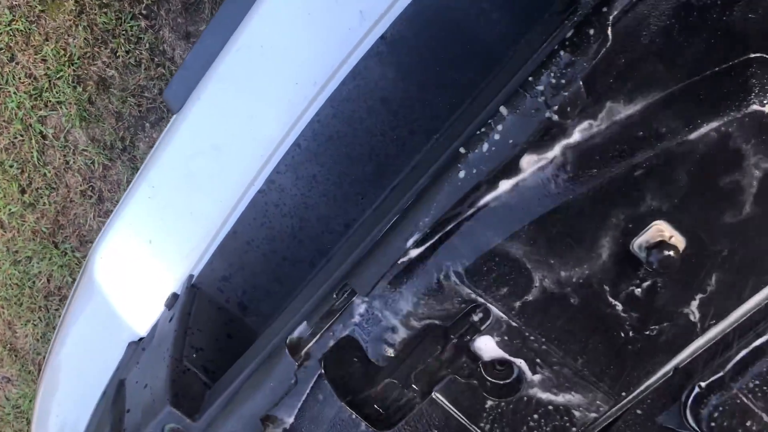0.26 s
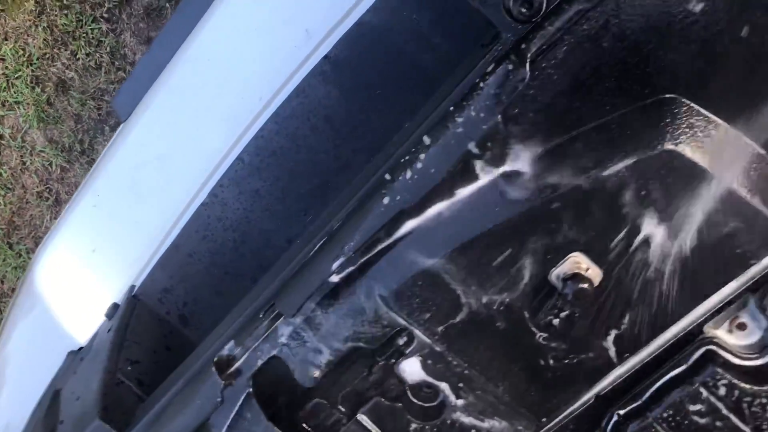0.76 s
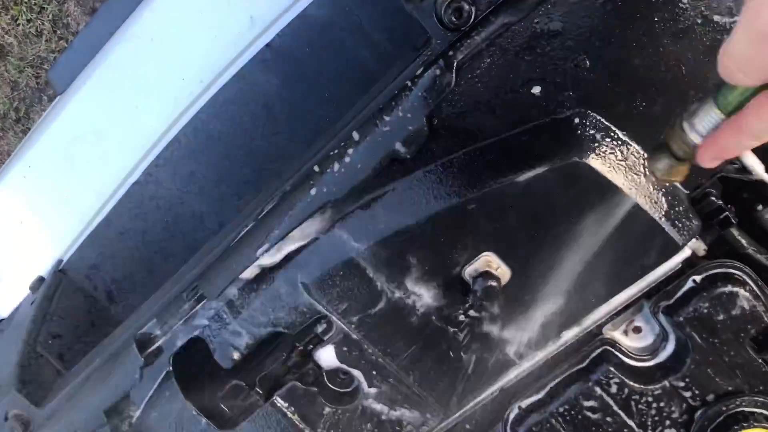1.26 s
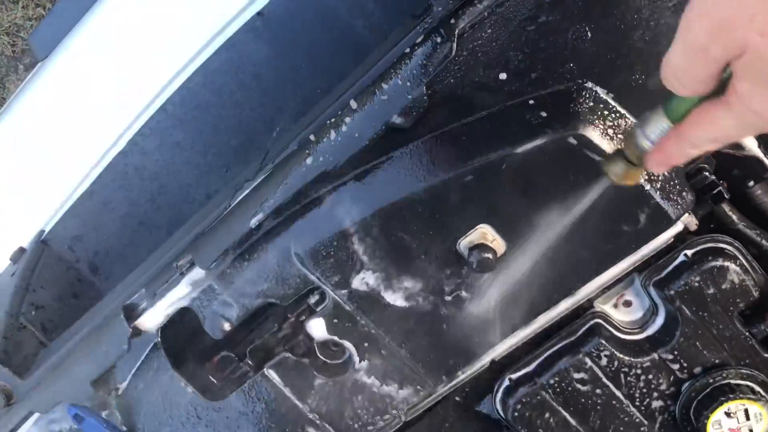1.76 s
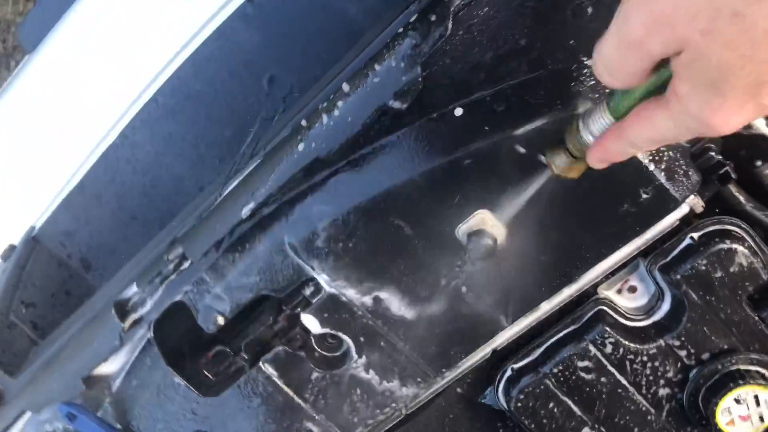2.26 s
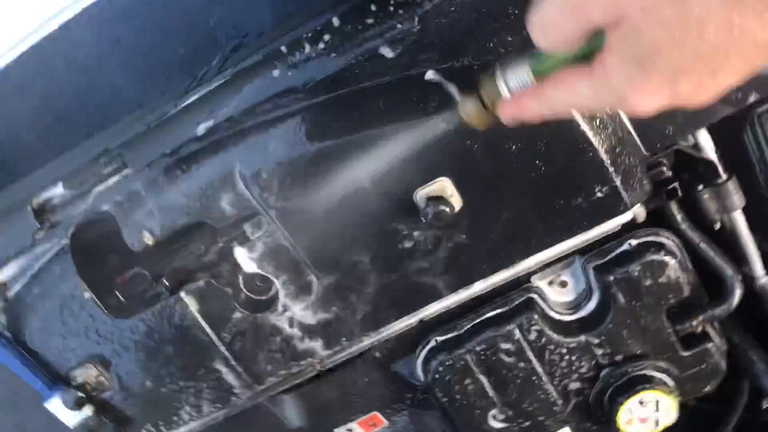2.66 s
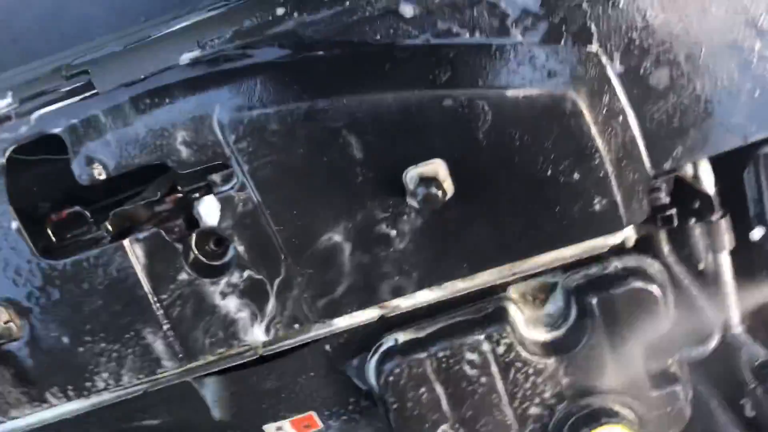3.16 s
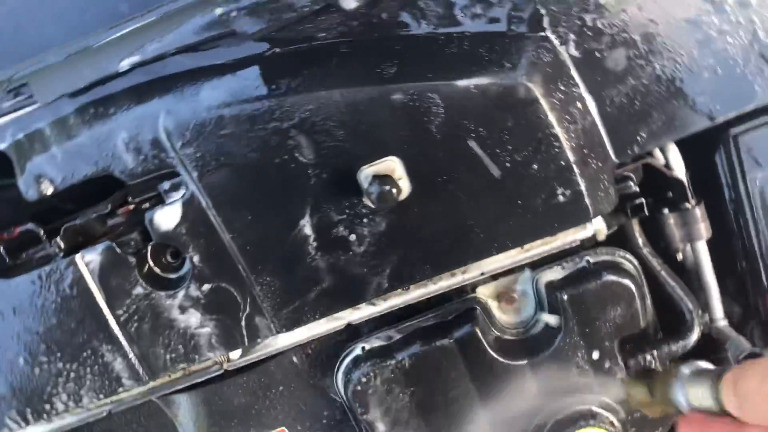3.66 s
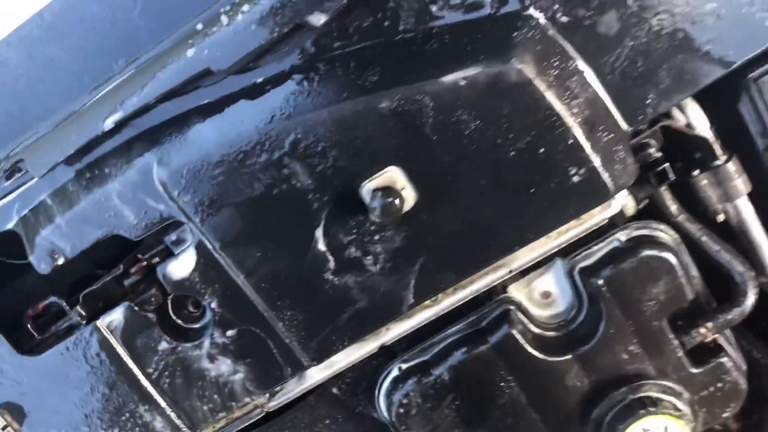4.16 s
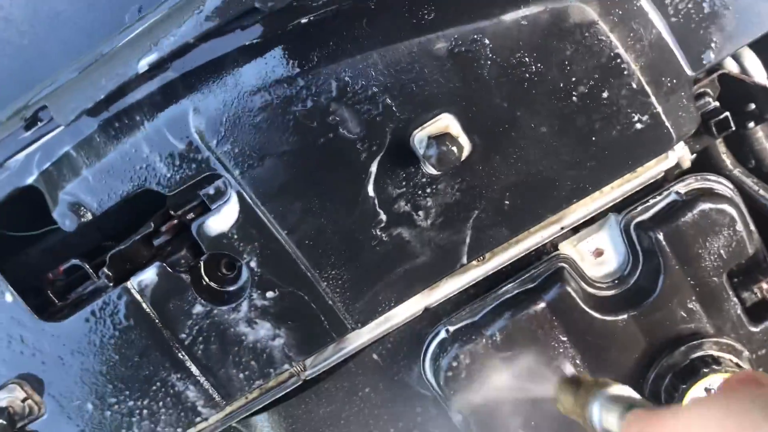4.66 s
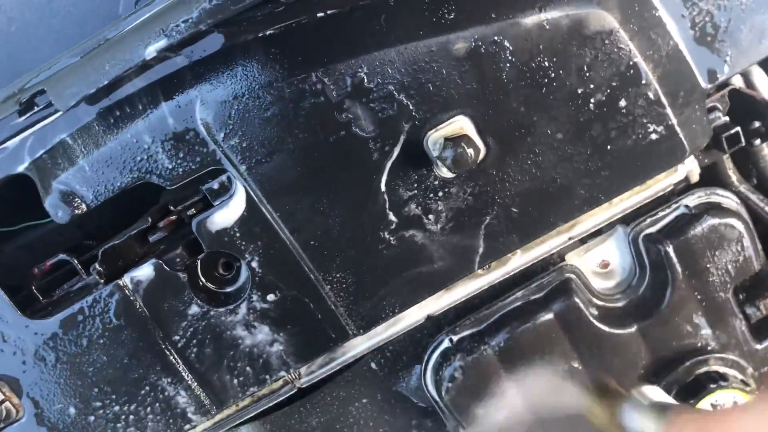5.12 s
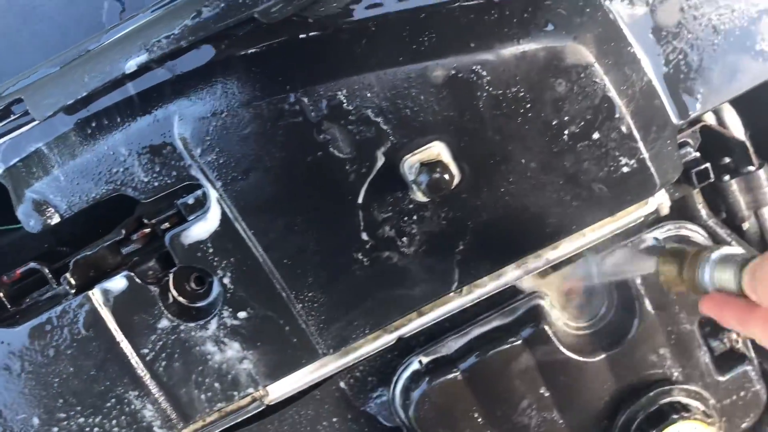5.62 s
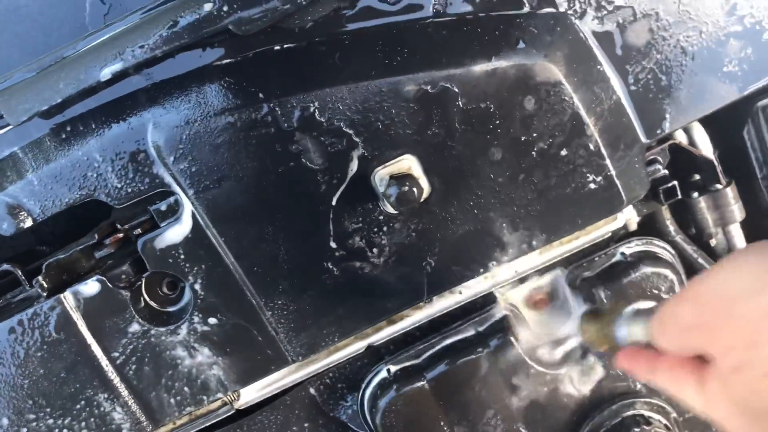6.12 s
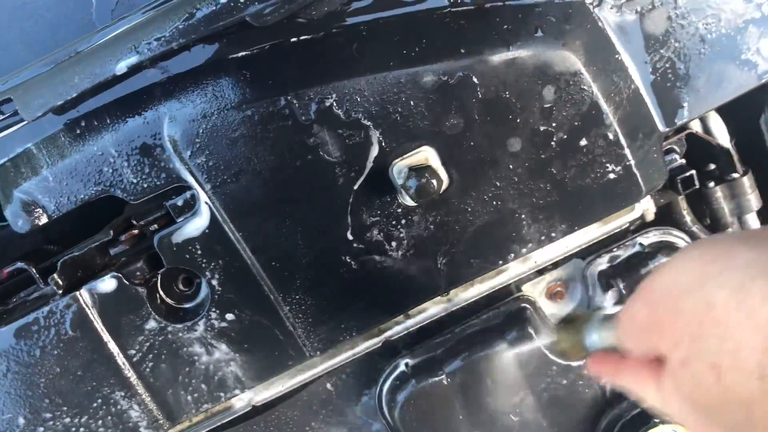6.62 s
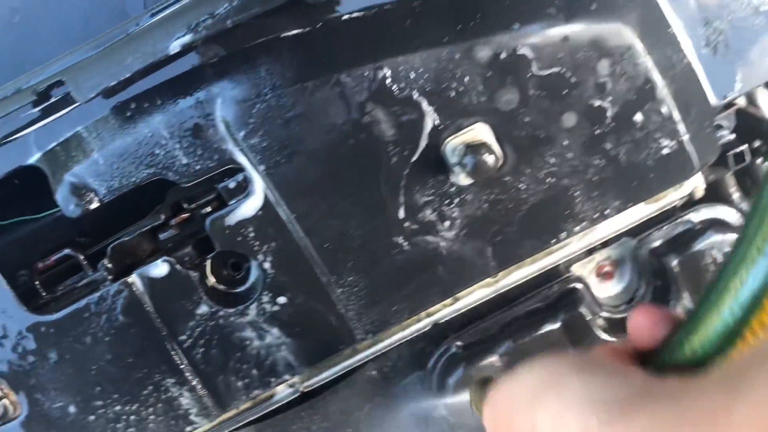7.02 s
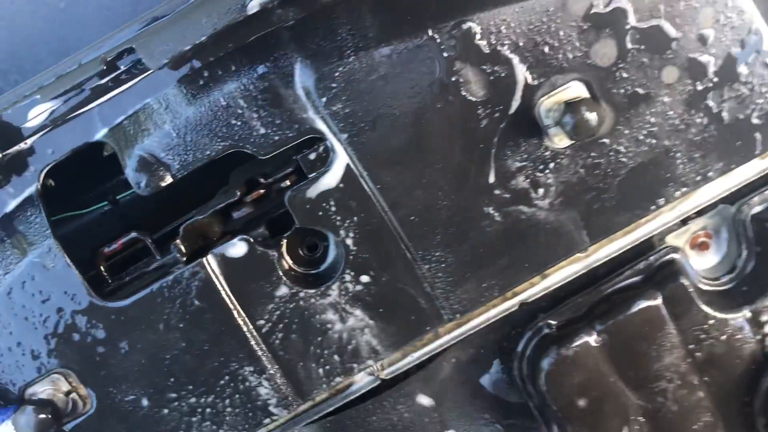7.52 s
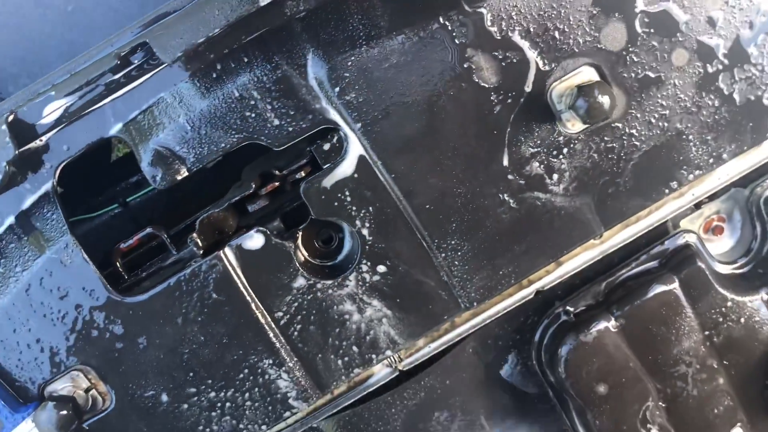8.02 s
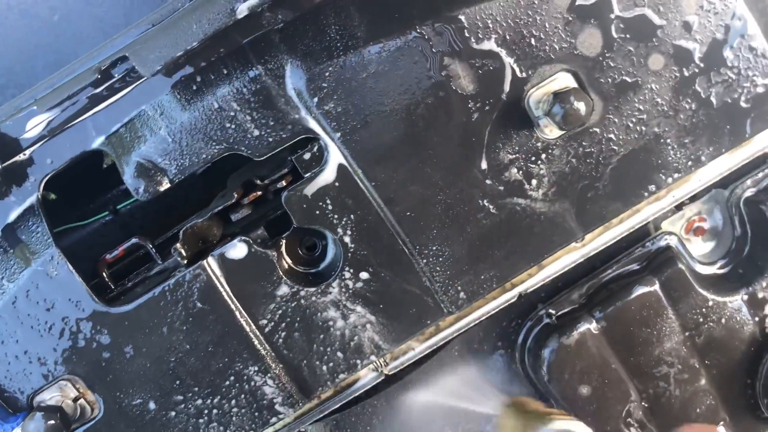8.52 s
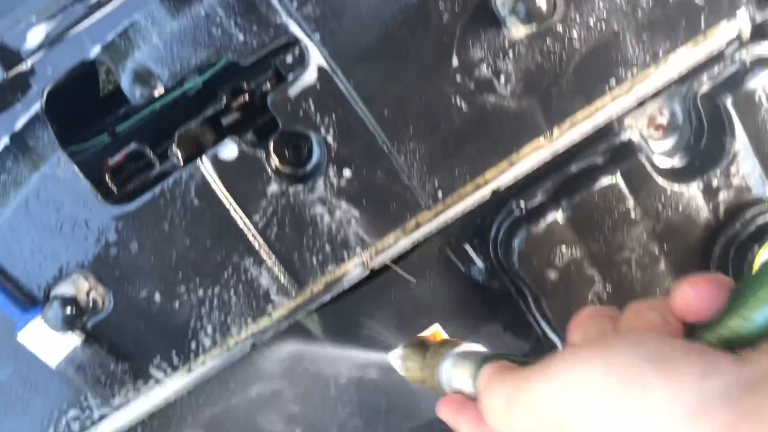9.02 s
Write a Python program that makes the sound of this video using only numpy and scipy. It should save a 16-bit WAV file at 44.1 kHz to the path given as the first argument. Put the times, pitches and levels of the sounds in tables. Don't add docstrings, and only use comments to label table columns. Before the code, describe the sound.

Outdoors, a garden hose nozzle sprays plastic engine covers at arm's length from one microphone. Bright, airy hiss mixes with splashing and light hollow drumming. Coarse bursts flare as the jet crosses edges, clustering past the middle. A firm hollow knock comes around seven seconds, then the spray settles on a ribbed box with a denser rattle. Low traffic rumbles faintly behind.

```python
import sys
import numpy as np
from scipy import signal
from scipy.fft import rfft, irfft, next_fast_len
from scipy.io import wavfile
from scipy.ndimage import uniform_filter1d, map_coordinates

SR = 44100
rng = np.random.default_rng(int(sys.argv[2]) if len(sys.argv) > 2 else 0)


def magnitude_from_level(level_db):
    exponent = np.asarray(level_db, float) / 20
    return 10 ** exponent


def transcribe(signal):
    frames = np.atleast_2d(signal).T
    limited = np.clip(frames, -1, 1)
    pcm = np.round(limited * 32767).astype(np.int16)
    wavfile.write(sys.argv[1], SR, pcm)


N = 409248
TIME = np.arange(N) / SR
BOX_S = 7.3


def unit(x):
    return x / np.sqrt(np.mean(x ** 2) + 1e-20)


def unit_level(z):
    return np.sqrt(np.mean(abs(z) ** 2))


def along(points, hz):
    f, v = np.transpose(points)
    return np.interp(np.log(hz + 1), np.log(f + 1), v)


def curves(rows, at=TIME):
    s, *cols = np.transpose(rows)
    return [np.interp(at, s, c) for c in cols]


def wobble(rate):
    knots = rng.standard_normal(int(N * rate / SR) + 4)
    return map_coordinates(knots, [TIME * rate])


def swell(t, rise, fall, power=1.22):
    side_s = np.where(t < 0, max(rise, 1e-3), max(fall, 1e-3))
    return np.exp(-abs(t / side_s) ** power)


def swells(rows, power=1.3):
    coarse = TIME[::64]
    total = sum(height * swell(coarse - s, rise, fall, power) for s, height, rise, fall in rows)
    return np.interp(TIME, coarse, total)


def filtered(x, response):
    m = next_fast_len(len(x) + 8192)
    return irfft(rfft(x, m) * response(np.fft.rfftfreq(m, 1 / SR)), m)[:len(x)]


def shaped(x, spectrum):
    points = [(spectrum[0][0] / 2, -90)] + spectrum
    return unit(filtered(x, lambda hz: magnitude_from_level(along(points, hz))))


def modes(peaks):
    return lambda f: sum((-1) ** k * magnitude_from_level(db) * 1j * f * w / (c * c - f * f + 1j * f * w)
                         for k, (c, w, db) in enumerate(peaks))


def patter(rate, spread_db, share):
    draw = rng.random((2, N))
    size = magnitude_from_level(-spread_db * np.log(draw[1] + 0.012)) * rng.standard_normal(N)
    drops = unit(size * (draw[0] < rate / SR))
    share = np.clip(share, 0, 1)
    return np.sqrt(share) * drops + np.sqrt(1 - share) * rng.standard_normal(N)


def patchy(x, depth_db, comb_db, whistle_db=0):
    # time_s, pitch_hz
    aim = [(0.0, 11700), (0.26, 11300), (3.33, 11400), (3.39, 12100), (3.57, 11600), (4.81, 11600),
           (4.88, 12100), (5.06, 11200), (5.27, 11800), (5.53, 11300), (6.33, 12000), (6.36, 11500),
           (6.72, 11400), (6.87, 12000), (6.95, 10800), (7.31, 11800), (8.71, 11600), (9.28, 11900)]
    hz, t, z = signal.stft(x, SR, nperseg=512)

    def blur(tall, wide):
        rows = uniform_filter1d(rng.standard_normal(z.shape), tall, 0)
        return unit(uniform_filter1d(rows, wide, 1))

    tremble_hz = 150 * np.interp(t, TIME, wobble(12))
    aim_hz = curves(aim, t)[0] + tremble_hz
    strength = 1 - 0.42 * (t > BOX_S) + 0.35 * blur(len(hz), 12)
    whistle = whistle_db * strength * np.exp(-((hz[:, None] - aim_hz) / 420) ** 2)
    gain_db = depth_db * blur(7, 7) + comb_db * blur(2, 28) + whistle
    return signal.istft(z * magnitude_from_level(gain_db), SR, nperseg=512)[1][:N]


def glancing():
    # middle_s, change_db, half_length_s
    lulls = [
        (5.355, -1.5, .05),
        (5.53, -2.5, 0.037),
        (6.64, -2.5, 0.084),
        (7.25, 0.5, .04),
        (7.92, -2, 0.097),
        (8.794, -3, .09),
        (9.09, -2.5, 0.028),
    ]
    return swells([(s, db, half, half) for s, db, half in lulls], power=3)


def traffic():
    # freq_hz, level_db per Hz
    rumble = [(13, -46), (22, -45), (41, 1), (59, 4.5), (113, 1), (128, 0), (152, -7.5), (200, -10.5),
              (260, -16), (440, -120)]
    # freq_hz, width_hz, level_db
    machines = [(60.3, 10, -1.5), (101.4, 24, -6.5), (121.2, 12.3, 0.5)]
    # middle_s, level_db
    passes = [(.5, -56), (1.4, -54), (2.19, -48), (2.9, -58), (3.14, -55), (3.62, -50), (3.85, -58),
              (4.26, -49), (4.6, -51), (5.1, -55), (5.45, -49), (5.7, -58), (6.06, -63), (6.8, -57),
              (7.12, -55), (8.28, -47), (8.67, -49), (9.03, -51)]
    pass_s = 0.089
    hums = unit(filtered(rng.standard_normal(N), modes(machines)))
    level = magnitude_from_level(-53.5) + swells([(s, 0.5 * magnitude_from_level(db), pass_s, pass_s) for s, db in passes])
    road = shaped(rng.standard_normal(N), rumble)
    return level * magnitude_from_level(1.4 * wobble(8.6)) * unit(road + 0.83 * hums)


def hose():
    # middle_s, level_db, half_length_s
    rubs = [
        (6.393, -53, .12),
        (7.27, -53.5, .09),
    ]
    drag = filtered(patter(150, 2.6, share=0.35), lambda f: modes([(300, 420, 0)])(f) ** 2)
    contact = swells([(s, magnitude_from_level(db), half, half) for s, db, half in rubs], power=4)
    return contact * magnitude_from_level(2.0 * wobble(25)) * unit(drag)


def knocks():
    # time_s, peak_db, ring_length_factor, upper_modes_db
    bumps = [(1.678, -49, 1, -1), (2.079, -52, 1, 1), (2.334, -44, 1.1, 5.5), (3.271, -52, 0.91, -12),
             (4.411, -30.5, 0.71, 3), (5.31, -41.5, 1.3, -7), (7.104, -17.5, 0.96, -3), (7.194, -44, 1, -8),
             (7.241, -35, 1, -12), (7.721, -63, 1, -9), (8.251, -44, 0.79, -14), (8.782, -40, 0.74, -5)]
    # freq_hz, level_db, t60_s
    cover_modes = [(113, -11, 0.17), (190, -9.5, 0.16), (285, 1, 0.11), (377, -3, 0.17), (446, 2.5, 0.046),
                   (603, -4, 0.071), (753, -7.5, 0.07), (934, -8, 0.042), (1300, -20, .04),
                   (1750, -22, .04)]
    out, t = np.zeros(N + SR), TIME[:SR // 3]
    soft = 1 - np.exp(-(t / .004) ** 2)
    for s, db, length, upper_db in bumps:
        ring = 0
        for hz, level, t60 in cover_modes:
            a, b = rng.standard_normal(2)
            ring_db = level + 0.28 * a + upper_db * (hz > 330) - 60 * t / (length * t60)
            ring = ring + magnitude_from_level(ring_db) * np.sin(2 * np.pi * hz * (1 + 0.0038 * b) * t)
        thud = filtered(rng.standard_normal(len(t)), lambda f: modes([(330, 450, 0)])(f) ** 2)
        thud = thud * magnitude_from_level(5 - 60 * t / (length * 0.23))
        tick = filtered(rng.standard_normal(len(t)), lambda f: modes([(1100, 800, 0)])(f) ** 2)
        tick = tick * magnitude_from_level(upper_db + 10 - 60 * t / 0.026)
        out[round((s - .003) * SR):][:len(t)] += magnitude_from_level(db - 2.5) * ((ring + thud) * soft + tick)
    return out[:N]


def runoff():
    # freq_hz, level_db per Hz
    drip_colour = [(82, -37), (140, -15), (226, -10), (370, -3.5), (497, -7), (549, -1.5), (884, -7),
                   (1000, -1), (1300, -11), (2200, -120)]
    # time_s, level_db
    pooling = [(0, -57), (.7, -52.5), (2.1, -55.5), (3, -53), (3.35, -59), (3.8, -55), (4.15, -60),
               (4.7, -56), (5.2, -60), (5.5, -56), (5.9, -59.5), (6.9, -60), (7.1, -55.5), (8.9, -59),
               (9.2, -56.5)]
    level_db = curves(pooling)[0] + 1.1 * wobble(11.0) + 1.6 * wobble(3)
    return magnitude_from_level(level_db) * shaped(patter(200, 2.0, share=0.26), drip_colour)


def ribbed_box():
    # freq_hz, width_hz, level_db
    rib_modes = [(1070, 66, -1), (1290, 12, -2), (1515, 98, 2), (2236, 85, -3), (3070, 55, -3),
                 (4500, 71, -10), (5230, 69, -2), (6180, 110, -12)]
    settled = np.clip((TIME - BOX_S) / 0.28, 0, 1) ** 2
    level_db = -44 + 1.8 * wobble(15) + .3 * wobble(3.2) + 1.1 * glancing()
    spray = patchy(patter(2000, 1.6, share=0.39), depth_db=3.0, comb_db=3.5)
    ringing = filtered(spray, lambda f: modes(rib_modes)(f) / (1 + (950 / (f + 1)) ** 6))
    return settled * magnitude_from_level(level_db) * unit(ringing)


def hollow_cover():
    # time_s, level_db, rise_s, fall_s
    sweeps = [
        (3.13, -59, .06, 0.061),
        (5.75, -63, 0.074, .3),
        (6.36, -53.5, 0.063, 0.48),
        (7.2, -51, .06, 0.09),
        (7.4, -58, 0.36, 1),
        (8.8, -58.5, .12, 0.088),
    ]
    stray = magnitude_from_level(-67)
    level = stray + swells([(s, magnitude_from_level(db), rise, fall) for s, db, rise, fall in sweeps])
    ringing = filtered(patter(300, 3.7, share=0.56),
                       modes([(195, 56, -13.5), (279.2, 15.3, 0.5), (368, 31, -11.0)]))
    return level * magnitude_from_level(0.9 * wobble(8.3)) * unit(ringing)


def edge_crossings():
    # time_s, level_db, swell_s, hump_hz, low_edge_hz
    climbs = [(.1, -33, 0.045, 13000, 7950), (.37, -33, 0.043, 13000, 8000), (.88, -34.5, .05, 13000, 6000),
              (1.12, -34, .02, 12000, 8000), (2.34, -39, .015, 14000, 10000), (2.6, -40, .03, 13000, 9000),
              (2.84, -39, .02, 13000, 9000), (3.12, -40, 0.035, 7000, 2500),
              (3.189, -28, 0.07, 10700, 1980), (3.66, -33.5, 0.051, 12000, 3500),
              (3.715, -33.5, 0.034, 11100, 3500), (5.25, -38, .03, 12000, 7000),
              (5.442, -33, 0.0089, 2600, 2000), (5.489, -23, 0.017, 10800, 6500),
              (5.85, -34, 0.038, 11000, 3500), (5.96, -31.5, 0.01, 10000, 3500),
              (6.115, -30.5, 0.028, 8000, 2270), (6.2, -39, .015, 11000, 5000),
              (6.3, -35, 0.0095, 5000, 2500), (6.35, -34, .01, 12000, 8000), (6.86, -39, .1, 12000, 7000),
              (8.84, -36, .03, 12000, 8000), (9.0, -34.5, 0.072, 6000, 3000)]
    # time_s, level_db, fade_s, hump_hz, low_edge_hz
    strikes = [(3.0, -39, .04, 9000, 4000), (3.385, -33, 0.083, 12000, 7000),
               (3.408, -31.5, 0.084, 6000, 1390), (4.76, -37, .04, 8000, 4000),
               (5.416, -28.5, 0.029, 6040, 3240), (5.56, -36.5, 0.064, 7000, 3000),
               (5.685, -30.5, 0.056, 11000, 5000), (5.795, -29.5, 0.042, 5960, 2090),
               (5.925, -32, 0.032, 4160, 2500), (6.01, -34, 0.048, 12000, 6000),
               (6.08, -28, 0.023, 4130, 2130), (6.165, -31, 0.028, 6000, 3020),
               (7.14, -37, 0.044, 6500, 4000), (7.32, -38, .05, 5300, 2000), (9.12, -38, .04, 9000, 4000)]
    cut_s, strike_s = 0.012, 0.015
    out = np.zeros(N)
    spray = patchy(patter(6000, 1.2, share=0.4), depth_db=1.0, comb_db=2.5) * magnitude_from_level(1.2 * wobble(220))
    crossings = [(s, db, slow, cut_s, hz, low) for s, db, slow, hz, low in climbs]
    crossings += [(s, db, strike_s, slow, hz, low) for s, db, slow, hz, low in strikes]
    for s, db, rise, fall, hump_hz, low_hz in crossings:
        part = slice(max(round((s - .2) * SR), 0), round((s + .3) * SR))

        def colour(f):
            hump = 1 + 0.8 * np.exp(-(np.log(f / hump_hz + 1e-3) / 0.35) ** 2)
            return hump / (1 + (low_hz / (f + 1)) ** 6)

        burst = unit(filtered(spray[part], colour))
        out[part] += magnitude_from_level(db) * swell(TIME[part] - s, rise, fall) * burst
    return out


def jet():
    # time_s, hiss_db, splash_over_hiss_db, drumming_over_hiss_db
    stream = [(0, -40.5, -4, -5.5), (.6, -39.5, -5, -6.5), (1.2, -39.5, -4, -7), (1.7, -40.5, -2.5, -8),
              (2.7, -38.5, -4.5, -9), (3.05, -39.5, -3.5, -7.5), (3.8, -37.5, -5.5, -10),
              (4.3, -36, -5.5, -8.5), (4.68, -39, -2, -6.5), (4.85, -37.5, -3.5, -8), (5.3, -36, -4, -9),
              (6.2, -35.5, -6.5, -10.5), (6.5, -36, -6, -11.5), (7.28, -37.5, -6, -11.5),
              (7.35, -35.5, 0, -8.5), (7.7, -34, -2, -6), (8.6, -34.5, -3, -7.5), (9.28, -35, -4, -9.5)]
    # freq_hz, level_db per Hz
    hiss_colour = [(4400, -21), (7500, -5), (9000, -0.5), (11500, 4), (13500, 1), (15500, 0), (20000, -2.5)]
    # freq_hz, level_db per Hz
    splash_colour = [(1760, -11), (3000, -8), (4490, -4.5), (4870, 1), (5250, -1), (6170, 1.5),
                     (7770, -1.5), (9000, -1.5), (10000, -1), (13000, -36), (22000, -120)]
    # freq_hz, level_db per Hz
    drum_colour = [(560, -15), (760, -15), (885, -7), (1040, -1), (1560, 1), (1860, -1.5), (2430, 0.5),
                   (3260, -2), (4200, -3), (5460, -6), (9240, -120)]
    hiss_db, splash_db, drum_db = curves(stream)
    flutter = 0.75 * wobble(9) + 0.73 * wobble(30) + .5 * wobble(110)
    graze_db = glancing()
    hiss = patchy(patter(6000, 1.1, share=0.32), depth_db=1.5, comb_db=2.2, whistle_db=3.5)
    splash = patchy(patter(4000, 0.89, share=0.18), depth_db=1.5, comb_db=1.4)
    drum = patchy(patter(2000, 1.7, share=0.14), depth_db=1.0, comb_db=2.0)
    splash_db = splash_db + graze_db + 0.39 * flutter + 0.34 * wobble(6)
    drum_db = drum_db + 0.66 * graze_db + 0.46 * flutter
    mix = magnitude_from_level(0.62 * flutter) * shaped(hiss, hiss_colour)
    mix += magnitude_from_level(splash_db) * shaped(splash, splash_colour)
    mix += magnitude_from_level(drum_db) * shaped(drum, drum_colour)
    return magnitude_from_level(hiss_db) * mix


def scene():
    covers = ribbed_box() + hollow_cover() + runoff()
    mono = traffic() + hose() + knocks() + covers + edge_crossings() + jet()
    return np.tile(mono, (2, 1))


def microphone(x):
    # freq_hz, level_db
    housing = [(4500, 1), (4900, -5), (5300, 0), (7000, -0.5), (7700, -1.5), (8500, -0.5), (9600, -0.5),
               (10350, -3), (10750, 1.5), (11600, 0), (13000, 3.5), (15700, 2.5)]
    return filtered(x, lambda hz: magnitude_from_level(along(housing, hz)) / (1 + (36 / (hz + 1)) ** 4) * (hz < 15820))


def channel_flecks(x):
    moments = [.785, 1.085, 1.83, 2.41, 2.785, 3.804, 3.872, 3.944, 4.207, 4.293, 4.5, 4.824, 5.149, 5.521,
               5.986, 7.216, 7.519, 7.542, 7.937, 8.03, 8.145, 8.214, 8.611, 8.678]
    hz, t, z = signal.stft(x, SR, nperseg=1024, noverlap=768)
    draw = rng.random((len(moments), 3))
    centre_hz = 4500 + 11000 * draw[:, :2] ** 1.1
    bands = abs(hz[:, None, None] / centre_hz - 1) < .19 / 2
    second = bands[..., 1] & (draw[:, 2] < .8)
    now = abs(t - np.c_[moments]) < .012
    where = (bands[..., 0] | second) * 1. @ now
    fresh = signal.stft(rng.standard_normal(N), SR, nperseg=1024, noverlap=768)[2]
    level = np.sqrt(abs(uniform_filter1d(abs(z) ** 2, size=24, axis=0)))
    noise = magnitude_from_level(-2.5) * where * level * fresh / unit_level(fresh)
    return signal.istft(noise, SR, nperseg=1024, noverlap=768)[1][:N]


def band_limit(x):
    return signal.sosfilt(signal.butter(12, 17000, fs=SR, output="sos"), x)


def record(dry):
    heard = np.array([microphone(ear) for ear in dry])
    side = channel_flecks(heard[0])
    return band_limit(heard + side * [[1], [-1]])


dry = scene()
out = record(dry)
transcribe(out)
```